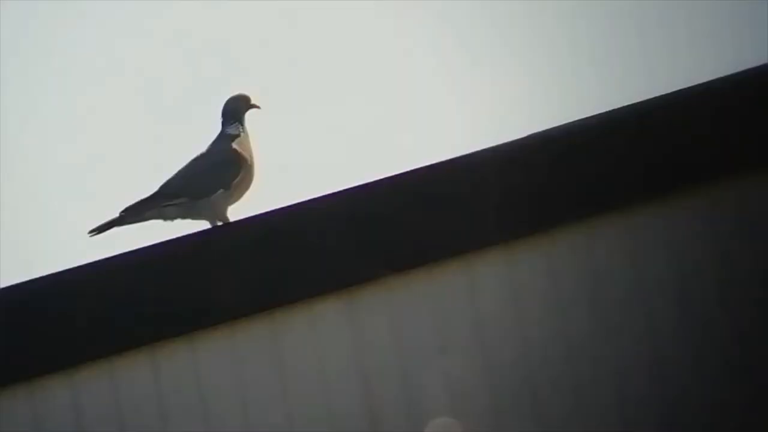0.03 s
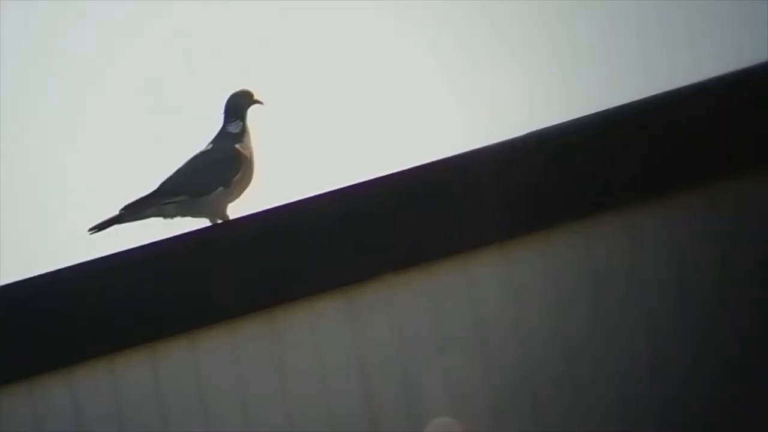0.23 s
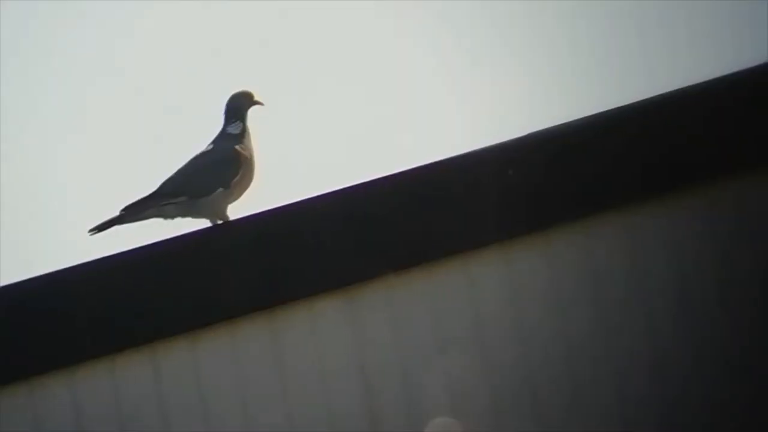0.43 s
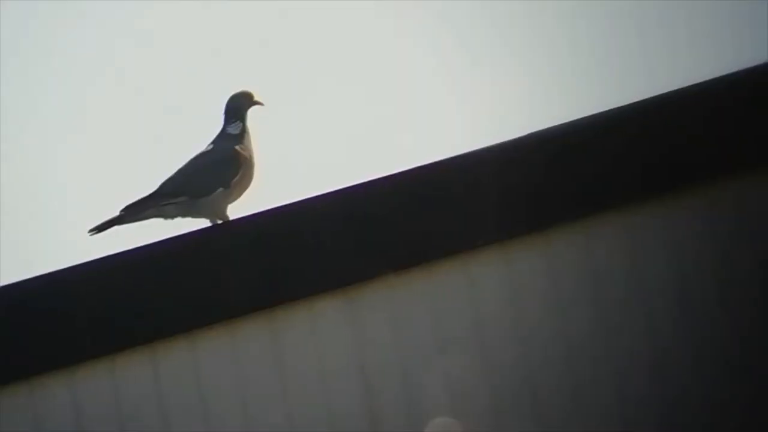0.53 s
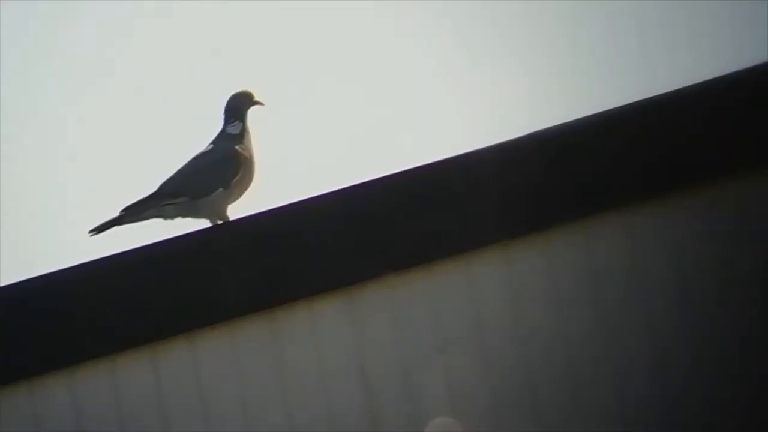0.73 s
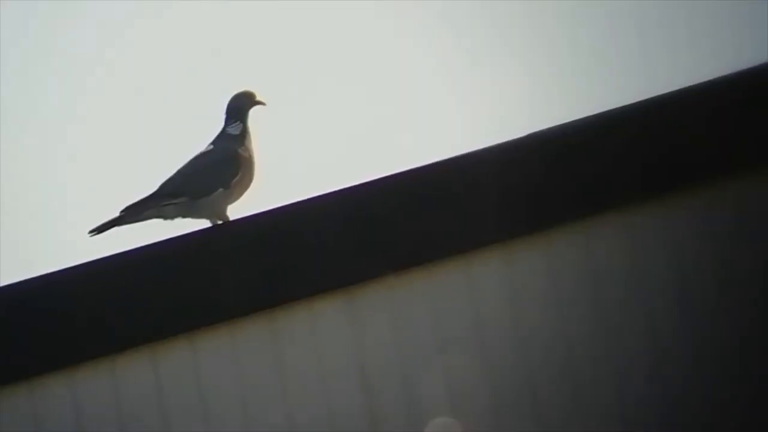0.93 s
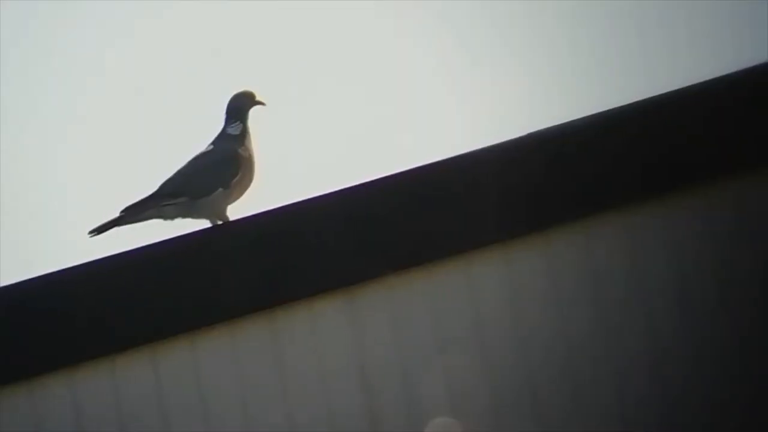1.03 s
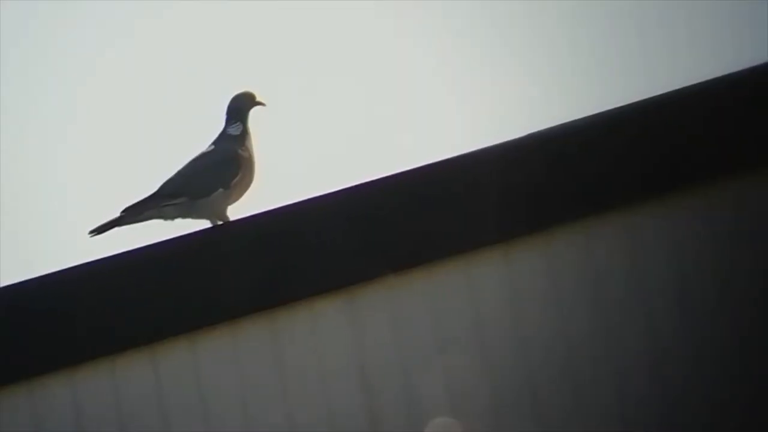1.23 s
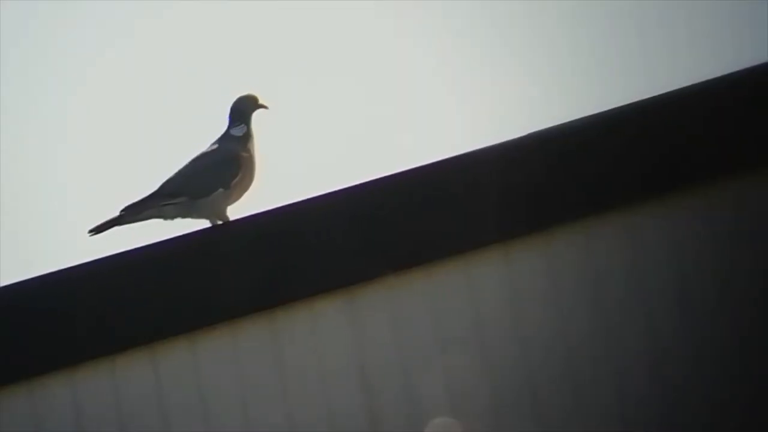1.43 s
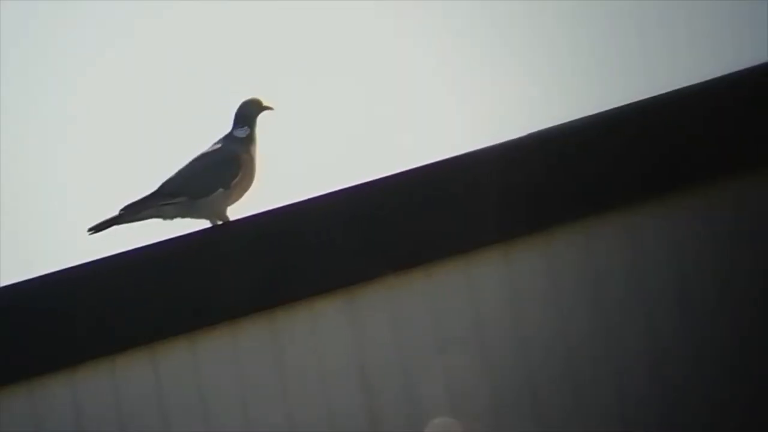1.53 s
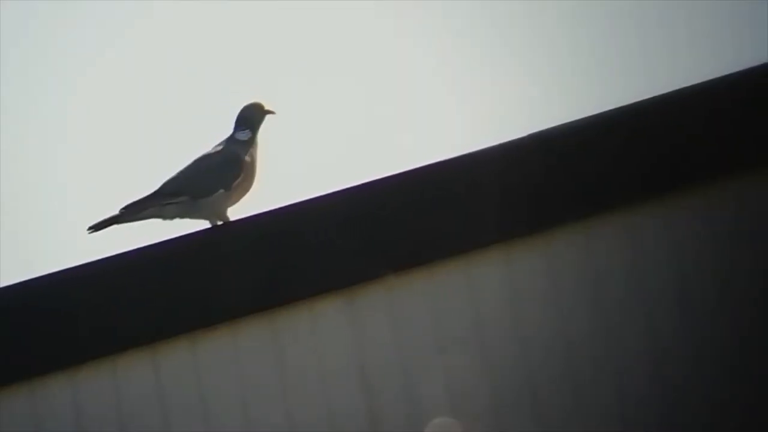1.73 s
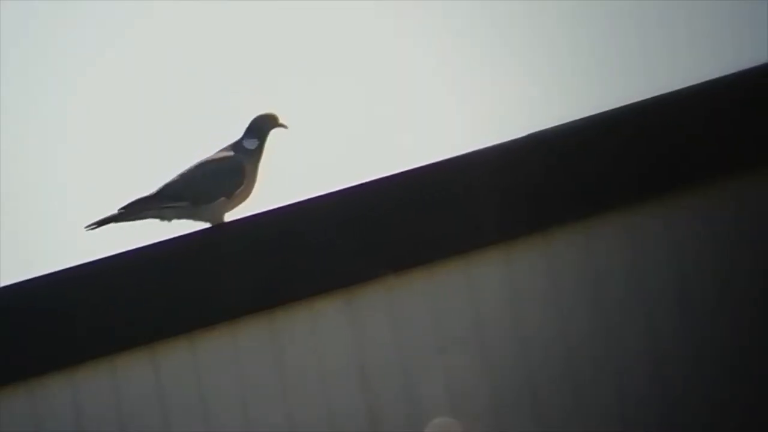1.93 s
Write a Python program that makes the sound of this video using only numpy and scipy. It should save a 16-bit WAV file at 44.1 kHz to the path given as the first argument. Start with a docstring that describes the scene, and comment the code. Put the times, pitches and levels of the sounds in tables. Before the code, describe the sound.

One songbird call rises, buzzes and ends on a soft lower note, echoing lightly off house walls. It follows a microphone click, two soft handling bumps and a brief hiss, with faint peeps and distant traffic in the background.

```python
"""A microphone opens with a click on the tail of a bird's call, over distant traffic and a faint hum.
Two soft handling bumps follow; a high hiss and a far whine swell and fade. Thin faraway peeps begin.
A small songbird, off to the left among houses, gives one rising whistle that breaks into a buzz
and drops to a soft end note. Walls scatter it back. A distant engine swells; two last peeps follow."""
import sys
import numpy as np
from scipy import signal
from scipy.io import wavfile

SR = 44100
rng = np.random.default_rng(int(sys.argv[2]) if len(sys.argv) > 2 else 0)


def dump_mix(stems):
    """Bounce the given channels to the path in sys.argv[1] as a 16-bit WAV at rate SR."""
    frames = np.atleast_2d(stems).T  # one column per channel
    limited = np.clip(frames, -1, 1)  # hard clip at full scale
    pcm = np.round(limited * 32767).astype(np.int16)
    wavfile.write(sys.argv[1], SR, pcm)


N = 88200
T = np.arange(N) / SR
SCATTER_T60_S = 0.47
OPPOSED = np.array([[1], [-1]])   # left +, right -
# swell of hiss and whine: t/s, level/dB
HISS_SWELL = [(.24, -91), (.33, -71.5), (.48, -69.5), (.56, -68.5), (.66, -83.5), (.9, -90)]


def from_db(db):
    """Decibels to gain."""
    return 10 ** (np.asarray(db) / 20)


def rms_one(x):
    """Scale to rms 1."""
    return x / np.sqrt(np.mean(x ** 2) + 1e-20)


def in_time(rows):
    """Interpolate (t/s, value) rows linearly."""
    return np.interp(T, *np.transpose(rows))


def at_hz(rows, hz):
    """Interpolate (f/Hz, value) rows over log frequency."""
    row_hz, values = np.transpose(rows)
    return np.interp(np.log(hz), np.log(row_hz), values)


def pan(db):
    """Left gain up, right gain down by db."""
    return from_db(db * OPPOSED)


def delayed(x, delay_s):
    """Shift later by delay_s."""
    return np.pad(x, (int(delay_s * SR), 0))[:N]


def drift(width_hz):
    """Low-passed random wander, rms about 1."""
    step, run_in = 40, 2000
    pole = np.exp(-np.pi * width_hz * step / SR)
    white = rng.standard_normal(N // step + run_in + 2)
    slow = signal.lfilter([1], [1, -2 * pole, pole * pole], white)[run_in:]
    return np.interp(np.arange(N) / step, np.arange(len(slow)), rms_one(slow))


def resonance(x, hz, width_hz):
    """Band-pass, peak gain 1."""
    r = np.exp(-np.pi * width_hz / SR)
    feedback = [1, -2 * r * np.cos(2 * np.pi * hz / SR), r * r]
    return signal.lfilter(np.array([1, 0, -1]) * (1 - r * r) / 2, feedback, x)


def reverb(x, t60_s):
    """Dense decaying reflections, different on each side."""
    tail = rng.standard_normal((2, N)) * from_db(-60 * T / t60_s)
    tail /= np.sqrt(np.sum(tail ** 2, axis=1, keepdims=True))
    return signal.fftconvolve(x[None], tail, axes=1)[:, :N]


def banded_noise(spectrum, swell_db=0, swell_above_hz=340, flicker_db=1.5):
    """Stereo noise in flickering fifth-octave bands, rms 1."""
    # left-right likeness: f/Hz, correlation
    likeness = [(40, 1), (140, 0.9), (260, 0.91), (500, -0.56), (1000, 0.041), (2000, -0.18),
                (4000, -0.0097), (15000, -0.073)]
    # balance: f/Hz, left minus right/dB
    balance = [(100, 1.5), (600, -2.5), (1200, 0), (3000, 2), (8000, 7.5), (11000, 1), (15000, -0.5)]
    out, edges_hz = 0, 20 * 2 ** (np.arange(50) / 5)
    white = rng.standard_normal((2, 2, N))
    for k, (low, high) in enumerate(zip(edges_hz, edges_hz[1:])):
        band = signal.butter(2, [low, high], "band", fs=SR, output="sos")
        mid, side = signal.sosfilt(band, white[k % 2])
        hz = np.sqrt(low * high)
        alike = np.clip(at_hz(likeness, hz), -1, 1)
        stereo = np.sqrt(1 + alike) * mid + np.sqrt(1 - alike) * side * OPPOSED
        level_db = at_hz(spectrum, hz) + flicker_db * drift(23.3) + swell_db * hz / (hz + swell_above_hz)
        out += from_db(level_db) * pan(at_hz(balance, hz) / 2) * stereo
    return rms_one(out)


def wavering_tones(lines, width_hz=4.4, spread_hz=820):
    """Narrow noise lines from (f/Hz, level/dB) rows; the sides differ more with pitch, up to spread_hz."""
    def tone(hz):
        phase = 2 * np.pi * hz * T
        return drift(width_hz) * np.sin(phase) + drift(width_hz) * np.cos(phase)
    out = 0
    for hz, db in lines:
        mid, side = tone(hz), min(hz / spread_hz, 1) * tone(hz)
        out += from_db(db) * (mid + side * OPPOSED) / np.sqrt(2)
    return out


def songbird():
    """Near-pure whistle and its weak octave; the buzz swings pitch and strength together."""
    # whistle pitch: t/s, f/Hz
    pitch = [(1.16, 2800), (1.22, 3060), (1.275, 3350), (1.303, 3590), (1.319, 3850), (1.346, 3900),
             (1.354, 4030), (1.372, 4010), (1.383, 4290), (1.41, 4350), (1.436, 4340), (1.449, 3720),
             (1.49, 3590), (1.53, 3590)]
    # whistle loudness: t/s, level/dB
    effort = [(1.15, -101), (1.175, -75), (1.21, -76), (1.23, -60.5), (1.275, -56), (1.295, -50.5),
              (1.308, -59.5), (1.322, -41), (1.342, -47), (1.354, -48), (1.42, -47), (1.434, -69),
              (1.455, -61.5), (1.51, -56), (1.535, -59), (1.56, -96)]
    # buzz depth: t/s, pitch swing/Hz
    buzz = [(1.3, 15), (1.346, 15), (1.353, 150), (1.371, 120), (1.384, 310), (1.43, 320), (1.452, 120),
            (1.49, 40)]
    buzz_hz, jitter, pulsing = 177.6, 0.0492, 0.5
    wobble_hz, octave_db = 14.3, -25.5
    swing_hz = in_time(buzz)
    flutter = np.sin(2 * np.pi * np.cumsum(buzz_hz * (1 + jitter * drift(58))) / SR)
    phase = 2 * np.pi * np.cumsum(in_time(pitch) + swing_hz * flutter + wobble_hz * drift(49)) / SR
    pulse = 1 + pulsing * swing_hz / swing_hz.max() * flutter
    strength = np.sqrt(2) * from_db(in_time(effort)) * pulse
    return strength * np.sin(phase), strength * from_db(octave_db) * np.sin(2 * phase)


def yard(x):
    """Direct sound, left ear first; wall echoes, quick scatter and a long faint tail."""
    # direct sound's balance: t/s, leftward pan/dB
    bird_pan = [(1.2, -1), (1.268, 1), (1.292, 3.5), (1.34, 4.5), (1.375, 3), (1.42, 7.5), (1.5, 6.5)]
    # wall echoes: delay/s, left/dB, right/dB
    walls = [(.0046, -5, -19), (.0125, -7, -12.5), (.029, -11, -54), (.048, -12, -29), (.135, -23, -25),
             (.3, -28, -56)]
    direct = np.array([x, delayed(x, delay_s=0.000115)]) * pan(in_time(bird_pan))
    echoes = sum(delayed(x, s) * from_db([[left_db], [right_db]]) for s, left_db, right_db in walls)
    scatter = from_db(-11.5) * reverb(x, SCATTER_T60_S)
    tail = from_db(-14) * pan(7) * reverb(x, t60_s=0.83)
    return direct + echoes + scatter + tail


def bird_calls():
    """A soft call that breaks off after the buzz, then the full call, its end note lingering."""
    lead_s, break_s = 1.178, 0.26
    end_hz, end_width_hz = 3676, 187
    whistle, octave = songbird()
    full_call = yard(whistle) + pan(5.5) * yard(resonance(octave, hz=8060, width_hz=510))
    end_note = resonance(resonance(whistle, end_hz, end_width_hz), end_hz, end_width_hz)
    lingering = from_db(-7.5) * pan(5) * reverb(delayed(end_note, delay_s=0.13), t60_s=0.7)
    short_call = yard(whistle * (T - lead_s < break_s))
    lead = int(lead_s * SR)
    early_call = from_db(-11) * np.pad(short_call[:, lead:], ((0, 0), (0, lead)))
    return early_call + full_call + lingering


def traffic():
    """Distant traffic and air, swelling gently above the bass."""
    # noise spectrum: f/Hz, relative density/dB
    spectrum = [(25, 0), (50, -2), (100, -3.5), (150, -3.5), (230, -5), (310, -10), (420, -12), (580, -8.5),
                (780, -12.5), (1100, -11.5), (1500, -13.5), (1900, -18), (3000, -19.5), (4400, -23),
                (5800, -28), (7000, -28.5), (8200, -26), (9200, -33.5), (10500, -34), (15500, -37)]
    # swell above the bass: t/s, relative level/dB
    swell = [(.24, -0.5), (.33, 1.5), (.47, 3.5), (.57, 3), (.68, 0.5), (1.05, 0), (1.25, 1), (1.5, 2),
             (1.8, 1), (2.0, -2)]
    return from_db(-57) * banded_noise(spectrum, in_time(swell))


def machine_hum():
    """Faint wavering tones of a distant machine."""
    # hum lines: f/Hz, level/dB
    lines = [(47, -66.5), (99, -68.5), (571, -78), (662, -74.5), (915, -81.5), (1051, -77.5)]
    return wavering_tones(lines)


def engine_drone():
    """Low tones of a distant engine, loudest near the end."""
    # drone envelope: t/s, level/dB
    envelope = [(.24, -69.5), (.6, -66.5), (.95, -73), (1.25, -72.5), (1.55, -66.5), (1.7, -60),
                (1.85, -65.5), (2.0, -70.5)]
    # drone lines: f/Hz, relative level/dB
    lines = [(139, 2), (190, -5.5), (232, -5.5)]
    return from_db(in_time(envelope)) * wavering_tones(lines)


def handling(ring_hz=55.7, decay_s=0.012):
    """Soft low bumps on the microphone's housing."""
    # bumps: t/s, level/dB
    bumps = [(0.264, -36.5), (0.319, -46)]
    out = 0
    for start_s, db in bumps:
        age_s = np.maximum(T - start_s, 0)
        out += from_db(db) * np.sin(2 * np.pi * ring_hz * age_s) * np.exp(-age_s / decay_s)
    return out


def hiss():
    """Brief swell of high noise."""
    # hiss spectrum: f/Hz, relative density/dB
    spectrum = [(30, -52), (2500, -15), (4500, -16), (6200, -11), (7300, -3), (8400, 1.5), (10000, -23),
                (15000, -34)]
    return from_db(in_time(HISS_SWELL)) * banded_noise(spectrum)


def far_whine(low_hz=1056, high_hz=1185):
    """Two far tones that swell with the hiss."""
    return from_db(in_time(HISS_SWELL) - 6) * wavering_tones([(low_hz, 8), (high_hz, 4)])


def far_peeps(wobble_hz=150, wet_db=1):
    """Thin falling whistles, blurred by distance."""
    # peeps: t/s, length/s, start f/Hz, end f/Hz, level/dB
    peeps = [(0.903, .075, 7050, 6820, -77), (1.189, 0.084, 7000, 6960, -72.5),
             (1.335, 0.075, 6760, 6470, -71.5), (1.903, 0.06, 8370, 7830, -74.5),
             (1.96, 0.07, 7030, 6640, -74.5)]
    out = 0
    for start_s, length_s, start_hz, end_hz, db in peeps:
        progress = np.clip((T - start_s) / length_s, 0, 1)
        hz = start_hz + (end_hz - start_hz) * progress + wobble_hz * drift(128)
        envelope = from_db(db) * np.sqrt(np.abs(np.sin(np.pi * progress)))
        out += envelope * np.sin(2 * np.pi * np.cumsum(hz) / SR)
    return pan(5.5) * (out + from_db(wet_db) * reverb(out, SCATTER_T60_S))


def scene():
    """Birds over the outdoor background."""
    swelling_tones = far_whine() + engine_drone()
    birds = bird_calls() + far_peeps()
    return swelling_tones + birds + machine_hum() + traffic() + hiss() + handling()


def record(dry):
    """The microphone opens with a dull, hollow click and an offset that settles; the top is cut."""
    open_s, settle_s, click_decay_s = 0.236, 0.16, 0.00047
    click_top_hz, cutoff_hz = 7670, 15800
    age_s, is_open = np.maximum(T - open_s, 0), T >= open_s
    offset = from_db(-27) * np.exp(-(age_s / settle_s) ** 1.7)
    click = from_db(-33.5) * np.exp(-age_s / click_decay_s) * OPPOSED
    dulling = signal.butter(2, click_top_hz, fs=SR, output="sos")
    thump = signal.sosfilt(dulling, (offset + click) * is_open + 1e-18)
    hollow_thump = thump - 0.62 * resonance(thump, hz=480, width_hz=550)
    top_cut = signal.ellip(10, 0.1, 70, cutoff_hz, fs=SR, output="sos")
    return signal.sosfilt(top_cut, dry * is_open - hollow_thump)


dry = scene()
out = record(dry)
dump_mix(out)
```